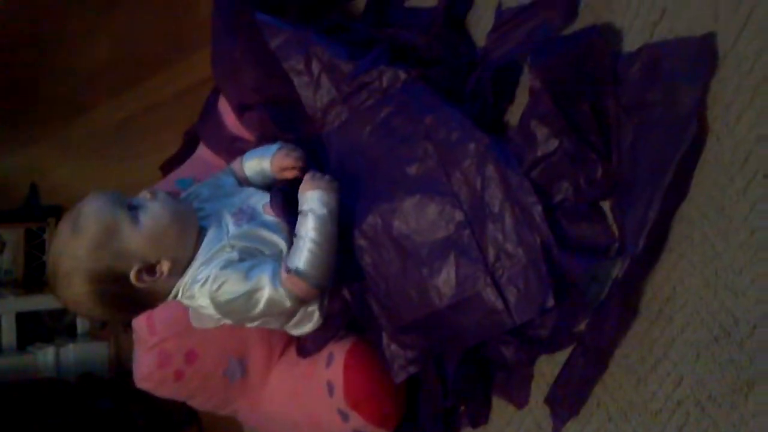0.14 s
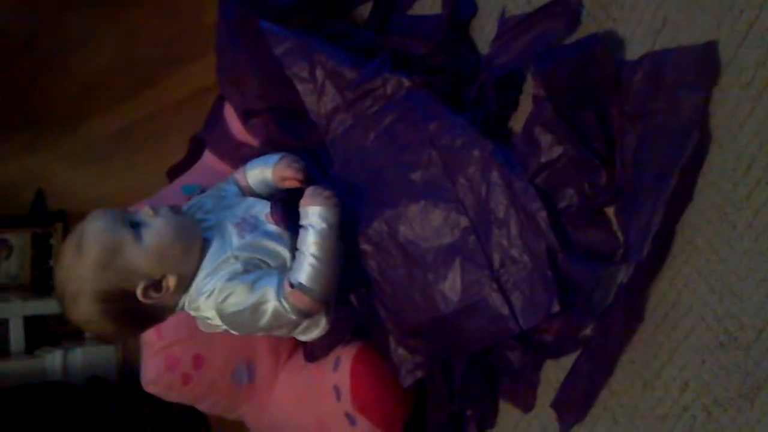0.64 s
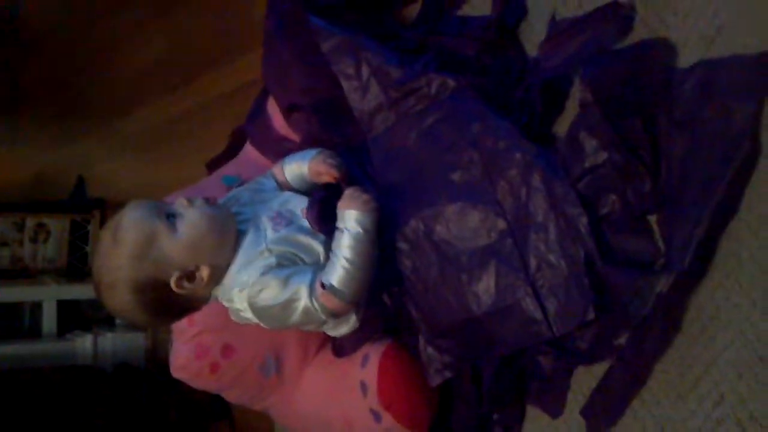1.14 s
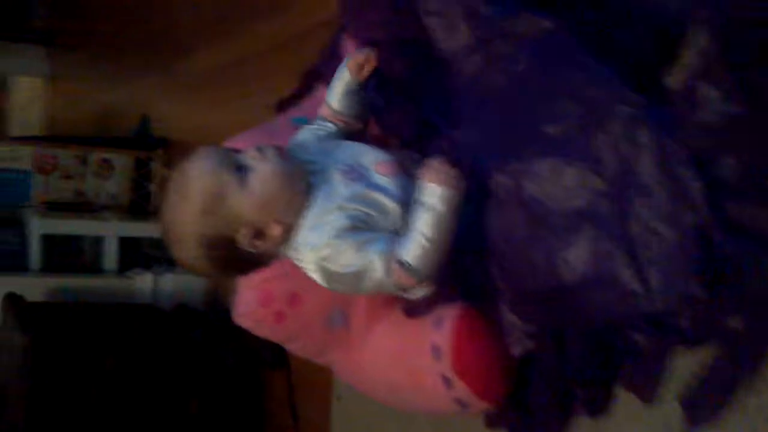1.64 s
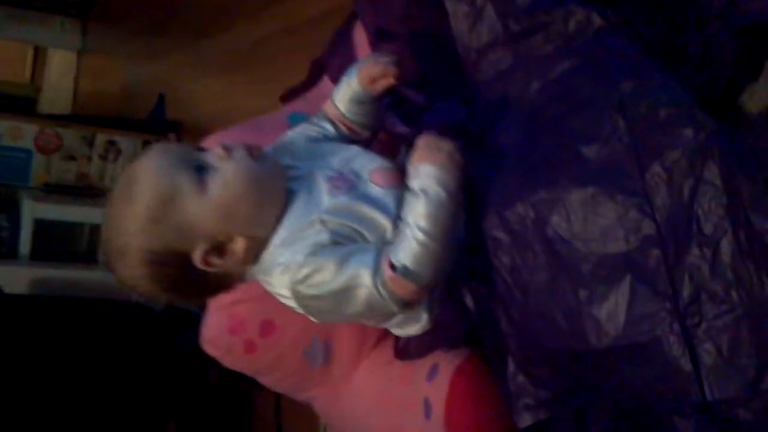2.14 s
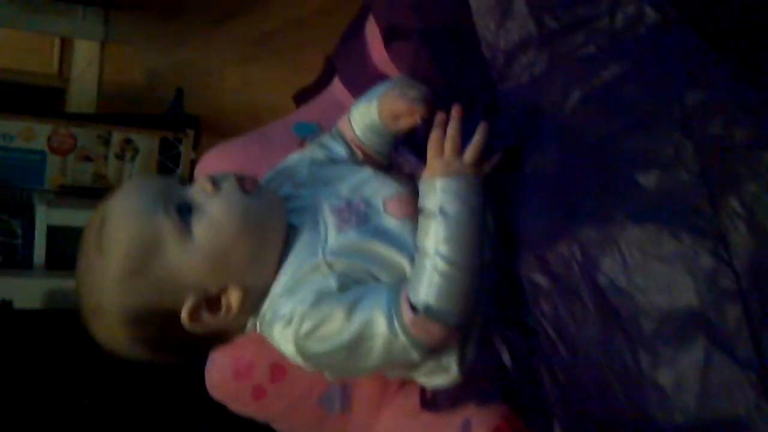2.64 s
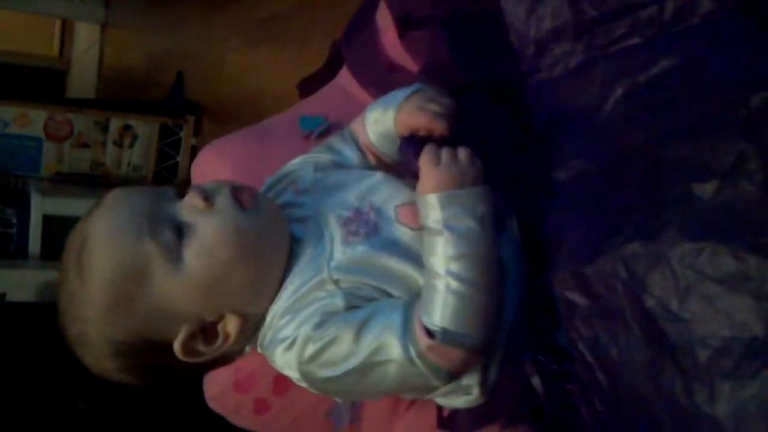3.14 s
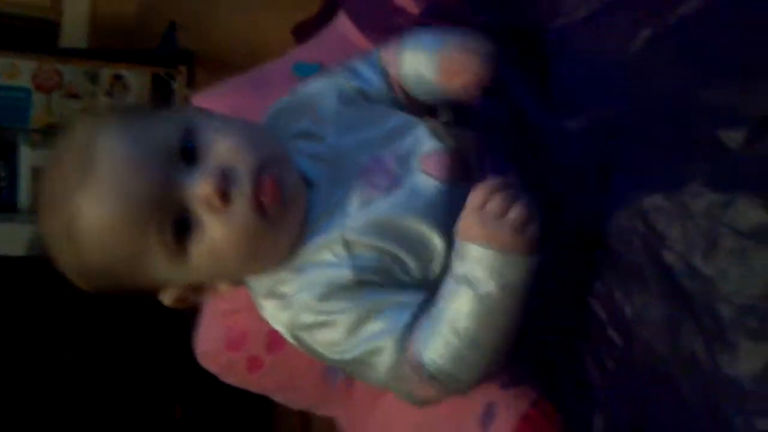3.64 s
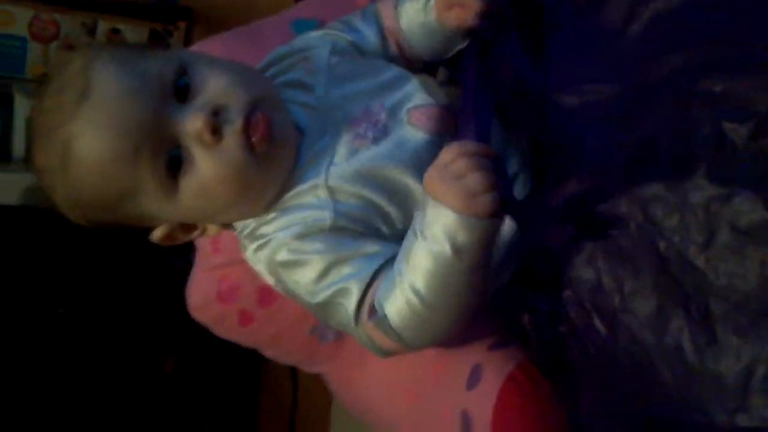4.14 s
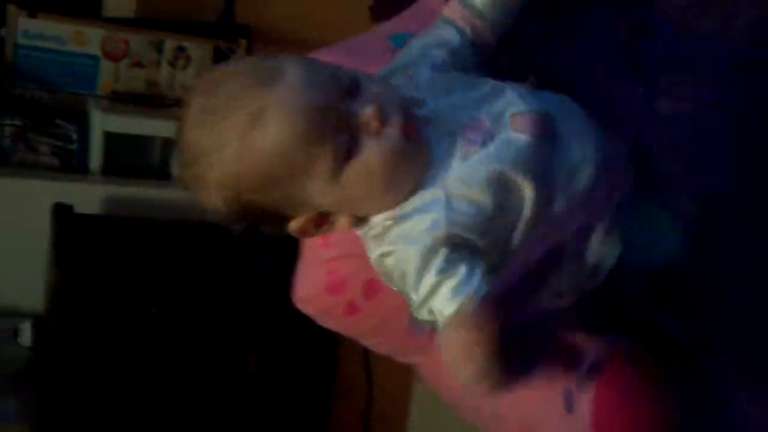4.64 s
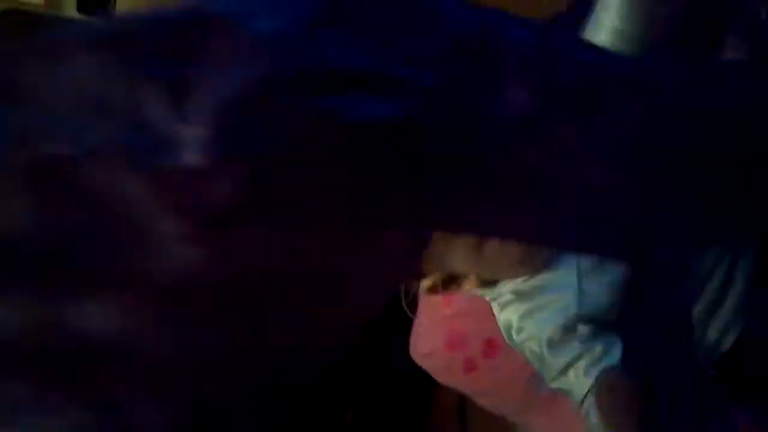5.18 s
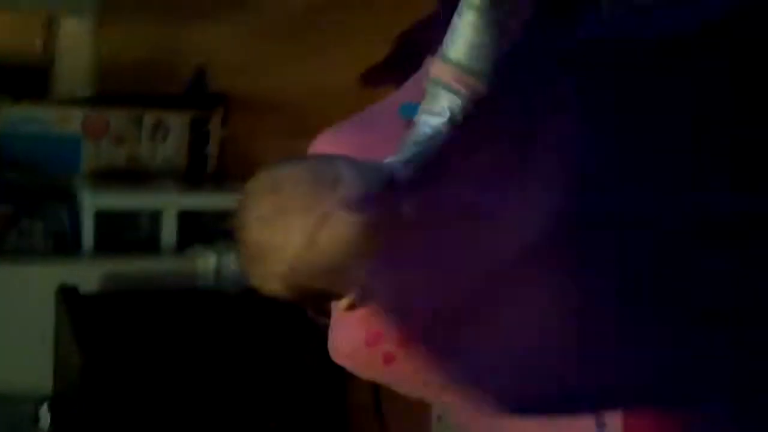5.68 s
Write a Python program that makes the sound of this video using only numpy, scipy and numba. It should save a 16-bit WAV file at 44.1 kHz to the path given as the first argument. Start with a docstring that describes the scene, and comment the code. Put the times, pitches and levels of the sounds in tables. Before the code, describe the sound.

Thin, dry tissue paper crinkles faintly in a quiet room, then is grabbed and crumpled harder in loud, bright, crackling bursts.

```python
"""Tissue paper crumpled on a carpet

Small hands grab and crumple a large sheet in a quiet carpeted room, faint at first and much louder later.
Creases are thousands of tiny resonant noise puffs, some standing out; the sheet's panels flap dully below.
Filtered noise makes the drag, swish, wavering tone, hum and room; damped sines make the bumps.
Two capsules hear it; each channel is one capsule minus the other, about a third of a millisecond late."""
import sys
import numpy as np
from scipy import signal
from scipy.fft import rfft, irfft, next_fast_len
from scipy.io import wavfile
from scipy.ndimage import uniform_filter1d
from numba import njit

SR = 44100
rng = np.random.default_rng(int(sys.argv[2]) if len(sys.argv) > 2 else 0)


def voltage_ratio(level):
    """Linear amplitude factor for a level in decibels (scalar or array-like)."""
    return 10 ** (np.asarray(level, float) / 20)


def put_to_file(sound):
    """Save the sound as 16-bit audio at rate SR, in the file named by the first command-line argument."""
    columns = np.atleast_2d(sound).T  # one column per channel
    safe = np.clip(columns, -1, 1)
    whole_steps = np.round(safe * 32767)
    wavfile.write(sys.argv[1], SR, whole_steps.astype(np.int16))


N = 255339


def level(x, db):
    """Scale to an rms level."""
    return x * voltage_ratio(db) / np.sqrt(np.mean(x ** 2))


def curve(table):
    """Columns of a timed table, joined by straight lines, as one value a sample."""
    s, *columns = np.transpose(table)
    return [np.interp(np.arange(N) / SR, s, c) for c in columns]


def colour(x, points):
    """Zero-phase filter through (f/Hz, gain/dB) points."""
    hz, db = np.transpose(points)
    size = next_fast_len(N)
    f = np.maximum(np.fft.rfftfreq(size, 1 / SR), 1)
    gain = voltage_ratio(np.interp(np.log(f), np.log(hz), db))
    return irfft(rfft(x, size) * gain, size)[..., :N]


def band(x, lo_hz, hi_hz):
    """Butterworth band-pass."""
    sos = signal.butter(2, [lo_hz, min(hi_hz, .45 * SR)], "band", fs=SR, output="sos")
    return signal.sosfilt(sos, x)


def noise():
    """Two unrelated noises, one for each path to the microphone."""
    return rng.standard_normal((2, N))


def flicker(rate, depth_db):
    """Gain that wanders as fingers grip and slip: random dB values (rms depth_db) joined by straight lines."""
    k = int(SR / rate)
    steps = np.repeat(rng.standard_normal(N // k + 1), k)
    return voltage_ratio(depth_db * uniform_filter1d(steps, k)[:N])


def swell(s, db, rise_s, fall_s):
    """Gain that climbs to a peak and drops again, straight in dB; times are for 20 dB."""
    t = np.arange(N) / SR - s
    return voltage_ratio(db - 20 * np.where(t < 0, -t / rise_s, t / fall_s))


@njit
def bursts(noise, s, peak, hz, width, rise, fall):
    """Each snap is a puff of noise that swells and dies, heard through its own broad resonance."""
    out = np.zeros(len(noise))
    for j in range(len(s)):
        start = int(s[j] * SR)
        g = np.tan(np.pi * hz[j] / SR)
        k = width[j] / hz[j]
        count = min(int((rise[j] + 6 * fall[j]) * SR), 4096, len(out) - start)
        puff = np.zeros(max(count, 0))
        b, l, top = 0., 0., 1e-9  # two filter states, largest sample so far
        for i in range(count):
            t = i / SR
            envelope = min(t / rise[j], 1.) * np.exp(-max(t - rise[j], 0.) / fall[j])
            x = noise[(start + 977 * j + i) % len(noise)] * envelope
            v = (b + g * (x - l)) / (1 + g * (g + k))  # band-pass output
            b = 2 * v - b
            l = l + 2 * g * v
            puff[i] = v
            top = max(top, abs(v))
        for i in range(count):
            out[start + i] += peak[j] * puff[i] / top
    return out


def snaps(*shape):
    """The same snaps along both paths, each with its own fine grain."""
    return np.array([bursts(n, *shape) for n in noise()])


def swarm(per_s, spread_db, lo_hz, hi_hz, breadth, fall_s):
    """Snaps at random times; many small, few large; pitch scattered between two limits."""
    when, rank, pitch, length = rng.random((int(per_s * N / SR), 4)).T
    size = voltage_ratio(-spread_db * np.log(1 - .995 * rank))
    hz = lo_hz * (hi_hz / lo_hz) ** pitch
    fall = fall_s * (.5 + length)
    return snaps(when * N / SR, size, hz, breadth * hz, fall / 2, fall)


def hands():
    """Gains of creases, folds and flaps: kneading and grabs add as powers, slack shifts them to lower layers."""
    # Slack says how loose the sheet hangs: the gain of its flapping re the fine creases.
    # uneven kneading under the grabs, faint at first and much louder later: t/s, crease gain/dB, slack/dB
    kneading = [(0.0, -73, 3), (0.62, -78, 6), (1.22, -81, 13), (1.4, -63, -2), (1.65, -59.5, -2),
                (1.8, -70, 7), (1.98, -71, 11), (2.37, -57.5, 9), (2.75, -57.5, 3), (3.27, -57, 4),
                (3.42, -45.5, -4), (3.55, -51, -2), (3.72, -46, -5), (3.8, -55, 3), (4.22, -53, 4),
                (4.56, -55, -2), (4.6, -39, -6), (4.74, -37, -4), (4.85, -37, -10), (5.05, -45, -22),
                (5.2, -44, -19), (5.45, -38, -7), (5.59, -46, -4), (5.79, -41, -5)]
    # grabs: t of the peak/s, crease gain/dB, time to rise 20 dB/s, time to fall 20 dB/s, slack/dB
    grabs = [(0.06, -63, 0.15, 0.2, -6), (0.214, -65, 0.12, 0.15, 2), (0.325, -68, 0.06, 0.13, 3),
             (0.429, -65, 0.13, 0.15, -2), (0.58, -70, 0.3, 0.1, 4), (0.752, -63, 0.18, 0.14, -7),
             (0.835, -60, 0.08, 0.25, -2), (0.92, -60, 0.3, 0.12, 2), (0.97, -55, 0.05, 0.12, 1),
             (1.005, -57, 0.1, 0.06, 8), (1.281, -51, 0.045, 0.15, -18), (1.322, -48, 0.12, 0.09, -14),
             (1.864, -59, 0.1, 0.22, -2), (2.834, -52, 0.25, 0.13, 0), (2.943, -46, 0.1, 0.2, -5),
             (3.053, -42, 0.25, 0.06, -13), (3.149, -47, 0.4, 0.25, -7), (3.346, -42, 0.03, 0.05, -11),
             (3.572, -46, 0.04, 0.08, -7), (3.622, -28, 0.04, 0.12, -7), (3.652, -22.5, 0.07, 0.05, -9),
             (3.945, -42, 0.2, 0.35, -1), (4.117, -44.5, 0.4, 0.25, -5), (4.278, -30, 0.045, 0.33, -16),
             (4.484, -37.5, 0.3, 0.09, -4), (4.775, -28.5, 0.08, 0.35, -7.5), (4.9, -26.5, 0.1, 0.07, -7),
             (4.945, -29, 0.06, 0.1, -14), (5.002, -29, 0.25, 0.03, -18), (5.112, -32.5, 0.25, 0.13, -26),
             (5.23, -33, 0.06, 0.2, -16), (5.396, -34, 0.1, 0.12, -11), (5.545, -36.5, 0.1, 0.05, -12),
             (5.679, -30.5, 0.15, 0.09, -9)]
    fold_db, fold_per_slack = -5, 0.3  # wider folds re creases, dB; dB gained per dB of slack
    knead_db, knead_slack_db = curve(kneading)
    moves = [(voltage_ratio(knead_db), knead_slack_db)]
    moves += [(swell(*row[:4]), row[4]) for row in grabs]
    powers = 0
    for gain, slack in moves:
        shares = [1, voltage_ratio(fold_db + fold_per_slack * slack), voltage_ratio(slack)]
        powers = powers + np.array([gain * share for share in shares]) ** 2
    return np.sqrt(powers)


def crumple(crease, fold, flap):
    """Fine creases over a soft rub; wider folds sound lower, whole panels of the sheet flap lower still."""
    # colour of the fine creases: f/Hz, relative level/dB
    crease_colour = [(3000, -25), (5500, -12.5), (8000, -4.5), (10500, -1.5), (12500, -4.5), (14000, -8.5),
                     (16000, -12)]
    # colour of the wider folds: f/Hz, relative level/dB
    fold_colour = [(1500, 4), (2800, -6), (4200, -2.5), (5800, -6.5), (9000, -24)]
    # colour of the flapping panels: f/Hz, relative level/dB
    panel_colour = [(200, -49), (450, -5), (800, -6), (1400, -4.5), (2000, -0.5), (3000, -17.5), (5000, 5)]
    creases = swarm(2500, spread_db=2.5, lo_hz=3470, hi_hz=14300, breadth=1.9, fall_s=0.00055)
    rub = level(noise(), -9.5)
    grain = (level(creases, 0) + rub) * flicker(90, depth_db=1.57)
    flaps = swarm(500, spread_db=2.5, lo_hz=490, hi_hz=2400, breadth=0.76, fall_s=0.0027)
    rustle = level(noise(), 0.69)
    fine = level(colour(grain, crease_colour), -0.62)
    wide = level(colour(grain, fold_colour), -.5)
    panel = level(colour(level(flaps, 0) + rustle, panel_colour), -4.5)
    return crease * fine + fold * wide + flap * panel


def cracks(crease):
    """A bright snap of about a millisecond, a duller knock of the panel beneath it; more fall at random."""
    # single snaps that stand out from the crumpling around them:
    # t/s, peak level/dB, nominal f/Hz (see bright), dull knock re peak/dB
    standing_out = [(0.013, -44, 11600, -20), (0.135, -47, 9400, -20), (0.2062, -38, 9500, -14),
                    (0.4245, -44, 9600, -13), (0.6764, -43, 9700, -13), (0.7239, -36.5, 10800, -15),
                    (0.748, -40, 10000, -14), (0.7554, -41, 11100, -22), (0.824, -37.5, 9500, -8),
                    (0.847, -39, 9900, -13), (0.8677, -40, 5700, -26), (0.879, -35, 8650, -7),
                    (0.9178, -39, 8300, -8.5), (0.96, -31.5, 8500, -9), (0.994, -31.5, 9900, -8.5),
                    (1.233, -44, 8700, -14), (1.2706, -34, 7300, -21), (1.2796, -29, 9200, -23),
                    (1.313, -30, 9900, -28), (1.4101, -41, 8800, -16), (1.654, -40, 8800, -20),
                    (1.7318, -41, 10100, -15), (1.9946, -36.5, 9400, -11), (2.0176, -40.5, 9700, -6),
                    (2.21, -31.5, 10400, -17), (2.6385, -27, 11000, -23), (2.7724, -32, 10300, -12),
                    (2.8317, -34.5, 8700, -14), (2.893, -27, 9600, -19), (2.9048, -30, 11100, -16),
                    (3.021, -27, 9900, -19), (3.0502, -23, 11600, -23), (3.0562, -23, 11000, -15),
                    (3.0962, -29, 8200, -22), (3.134, -24.5, 9800, -12), (3.1481, -27.5, 10500, -23),
                    (3.153, -24, 10000, -20), (3.2166, -29, 6200, -33), (3.304, -32, 8600, -11),
                    (3.3413, -16, 11200, -37), (3.347, -24, 11400, -19), (3.398, -28, 9900, -23),
                    (3.4356, -26, 11600, -13), (3.4748, -28, 10200, -17), (3.537, -24, 9250, -20),
                    (3.557, -22.5, 10300, -23), (3.5694, -24, 7200, -28), (3.5805, -21, 7800, -31),
                    (3.5995, -14, 9900, -14), (3.6557, -11, 9000, -11), (3.6707, -21, 10200, -16),
                    (3.7593, -28, 9400, -14), (3.824, -31.5, 9800, -28), (3.8612, -24.5, 10000, -26),
                    (3.8818, -23, 9100, -14), (3.9144, -24.5, 10600, -29), (4.0419, -26, 10800, -15),
                    (4.0904, -27, 10500, -33), (4.1077, -27.5, 10400, -11), (4.1524, -22, 9000, -10),
                    (4.168, -23, 9100, -17), (4.2003, -21, 9600, -26), (4.2366, -26, 9400, -21),
                    (4.2636, -14, 10200, -22), (4.2733, -9, 8600, -14.5), (4.278, -14, 10000, -21),
                    (4.2856, -11, 9300, -27), (4.3054, -14, 9300, -11), (4.3962, -18, 10500, -24),
                    (4.4517, -13.5, 8900, -13.5), (4.5733, -26, 9000, -20), (4.5899, -23, 10200, -19),
                    (4.6424, -18.5, 9000, -14), (4.7084, -24, 8900, -5), (4.7512, -15, 10300, -9),
                    (4.7698, -13.5, 11600, -10.5), (4.8177, -12, 11600, -14), (4.8806, -14, 9200, -31),
                    (4.9041, -11, 9700, -11), (4.9435, -12, 10600, -19), (4.9911, -10, 9700, -31),
                    (5.0101, -8.5, 10700, -43), (5.0376, -18, 10400, -22), (5.0866, -15.5, 10600, -39),
                    (5.1155, -17, 12200, -32), (5.1368, -16, 12400, -34), (5.237, -18, 11100, -15),
                    (5.3262, -16.5, 10600, -20), (5.3859, -19, 9900, -18), (5.4792, -18.5, 10300, -17),
                    (5.5484, -14.5, 9550, -32), (5.675, -18, 8900, -11.5), (5.6815, -17, 9400, -14)]
    random_per_s = 26
    above_db, spread_db, low_db = 12, 2.5, -21  # least peak re crease gain, scatter, mean knock re peak
    when, rank, pitch, knock = rng.random((int(random_per_s * N / SR), 4)).T
    crease_db = 20 * np.log10(crease[(when * N).astype(int)])
    random_db = crease_db + above_db - spread_db * np.log(1 - .95 * rank)
    at_random = [when * N / SR, random_db, 8000 + 3500 * pitch, low_db + 16 * (knock - .5)]
    s, db, hz, knock_db = np.hstack([np.transpose(standing_out), at_random])
    one = np.ones(len(s))
    # time, peak, resonance Hz, width Hz, rise s, fall s
    bright = snaps(s, voltage_ratio(db), 1.024 * hz, 0.88 * hz, 0.00095 * one, 0.00066 * one)
    dull = snaps(s, voltage_ratio(db + knock_db), 1500 * one, 1100 * one, 0.00087 * one, 0.0022 * one)
    return bright + dull


def walls(x, t60, wet_db):
    """A short soft tail of scattered echoes: decaying noise, unrelated on the two paths."""
    t = np.arange(SR // 3) / SR
    tail = rng.standard_normal((2, len(t))) * np.exp(-np.log(1000) * t / t60) * (t > .002)
    tail = tail / np.sqrt(np.sum(tail ** 2, axis=1, keepdims=True))
    return x + voltage_ratio(wet_db) * signal.fftconvolve(x, tail, axes=1)[:, :N]


def drag(flap):
    """Low scuffing noise, a faint blurred tone within it, and a hollow swish."""
    # low drag of paper and cloth on the floor: t/s, gain/dB
    pulls = [(1.5, -70), (1.94, -74), (1.98, -55), (2.08, -61), (2.68, -54), (3.27, -60), (3.58, -55),
             (4.19, -64), (4.23, -54), (5.0, -58), (5.5, -57), (5.79, -63)]
    # a faint blurred low tone swells now and then: t/s, peak gain/dB, f/Hz
    waver = [(2.5, -57, 262), (2.64, -56, 330), (2.73, -52, 345), (3.13, -60, 432), (3.33, -54, 356),
             (3.4, -55, 385), (3.47, -53, 430), (3.75, -52, 365), (3.84, -55, 345), (4.24, -48, 363)]
    # a soft hollow swish: t/s, gain/dB
    swish_gain = [(2.05, -88), (2.15, -59.5), (2.45, -54.5), (2.72, -56), (2.95, -75)]
    # ridges of noise in the swish: f/Hz, half width/Hz, relative level/dB
    ridges = [(2270, 1800, -5), (5980, 390, -5), (8000, 290, -5.5)]
    flap_drag_db = -22  # a flapping sheet also drags
    half_hz, rise_s, fall_s = 18, 0.15, 0.12  # of the blurred tone; s per 20 dB
    t = np.arange(N) / SR
    pull = np.hypot(voltage_ratio(curve(pulls)[0]), voltage_ratio(flap_drag_db) * flap)
    scuff = level(band(noise(), 121, 590) * flicker(18, depth_db=3.0), 2.6) * pull
    fade_in = np.clip((t - pulls[0][0]) / 0.23, 0, 1)
    tone = sum(level(band(noise(), hz - half_hz, hz + half_hz), 0) * swell(s, db, rise_s, fall_s)
               for s, db, hz in waver)
    swish = sum(level(band(noise(), hz - half, hz + half), db) for hz, half, db in ridges)
    edge_s = np.minimum(t - swish_gain[0][0], swish_gain[-1][0] - t)
    sounding = np.clip(edge_s / 0.067, 0, 1)
    return fade_in * scuff + tone + sounding * swish * voltage_ratio(curve(swish_gain)[0])


def bumps():
    """Soft knocks, alike on both paths: a damped swing with a rounded start."""
    # dull bumps: t/s, peak level/dB, f/Hz, t60/s
    knocks = [(0.542, -43, 143, 0.03), (0.873, -50, 130, 0.035), (1.976, -41.5, 1120, 0.0028),
              (1.978, -39.5, 325, 0.018), (1.99, -49, 85, 0.081), (2.013, -45, 250, 0.024),
              (5.529, -39, 335, 0.029)]
    out = np.zeros(N + SR)
    t = np.arange(SR // 4) / SR
    for s, db, hz, t60 in knocks:
        decay = np.exp(-np.log(1000) * t / t60)
        swing = np.sin(2 * np.pi * hz * t) * decay * (1 - np.exp(-t * hz * 3))
        start = int(s * SR)
        out[start:start + len(t)] += voltage_ratio(db) * swing / np.abs(swing).max()
    return out[:N]


def room():
    """Steady rumble and hiss of filtered noise, with unsteady hum lines of narrow-band noise."""
    # colour of the quiet room: f/Hz, relative level/dB
    room_colour = [(20, -11), (50, -4.5), (90, 5), (160, -0.5), (270, -5), (420, -7), (650, -13.5),
                   (1000, -13), (2000, -18.5), (4000, -22.5), (8000, -27), (11000, -31), (16000, -39)]
    # unsteady hum lines: f/Hz, level/dB, half width/Hz
    hum_lines = [(121.7, -67, 7.6), (243, -65, 9.1), (292.6, -68.5, 1.9)]
    hum = sum(level(band(noise(), hz - half, hz + half), db) for hz, db, half in hum_lines)
    return level(colour(noise(), room_colour), -57.5) + hum


def scene():
    """Two capsules: long waves reach both alike, treble reaches the far one shaded and scattered."""
    # what the far capsule shares with the near one: f/Hz, gain/dB
    shared = [(100, 0), (800, -5), (1500, -21.5), (3000, -31), (16000, -54)]
    # what reaches the far capsule by other paths: f/Hz, gain/dB
    shadow = [(100, 0.5), (800, -6), (2000, -1.5), (4000, -5), (8000, -15.5), (11000, -2.5), (16000, 2)]
    crease, fold, flap = hands()
    paper = walls(crumple(crease, fold, flap) + cracks(crease), t60=0.068, wet_db=-9)
    direct, scattered = paper + drag(flap) + bumps() + room()
    far = colour(direct, shared) + colour(scattered, shadow)
    return np.array([direct, far])


def roll_off(x):
    """The treble ends steeply here."""
    return signal.sosfilt(signal.butter(12, 17010, fs=SR, output="sos"), x)


def record(dry):
    """Each channel is one capsule minus the late other one, which widens the image; bass and top are cut."""
    lag = 16  # samples
    x = signal.sosfilt(signal.butter(1, 70, "high", fs=SR, output="sos"), dry)
    x = signal.sosfilt(signal.ellip(10, .2, 60, 15750, fs=SR, output="sos"), x)
    late = np.pad(x, ((0, 0), (lag, 0)))[:, :N]
    balance = voltage_ratio(np.array([[-1.1], [1.1]]))  # left, right
    wide = (x - late[::-1]) * balance
    return roll_off(wide)


dry = scene()
out = record(dry)
put_to_file(out)
```